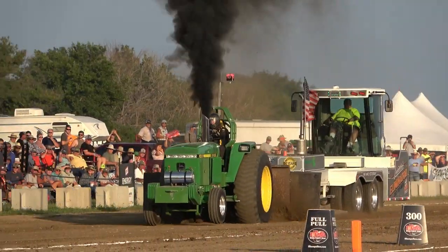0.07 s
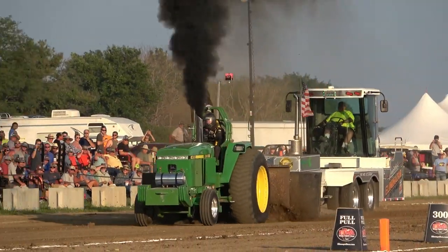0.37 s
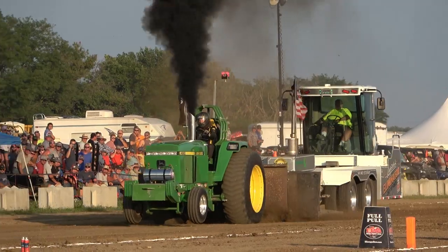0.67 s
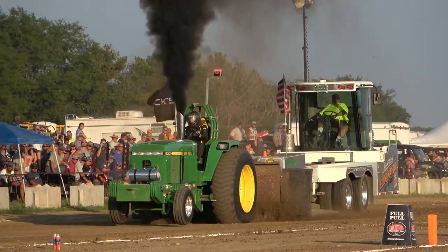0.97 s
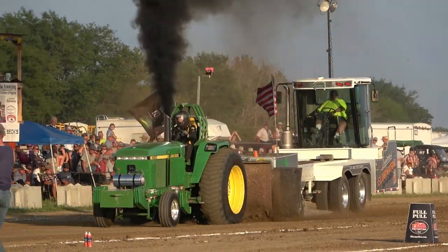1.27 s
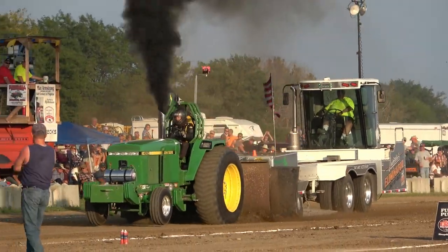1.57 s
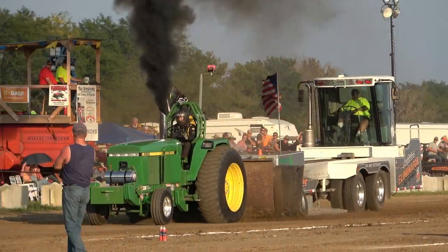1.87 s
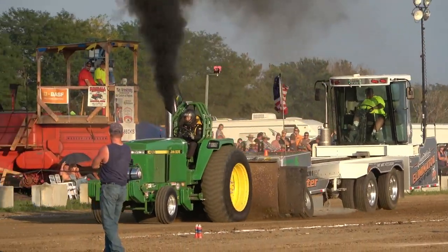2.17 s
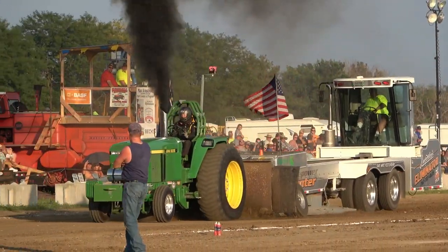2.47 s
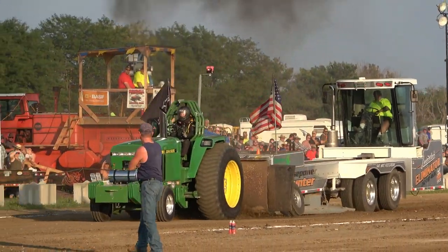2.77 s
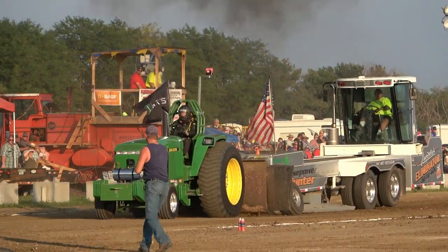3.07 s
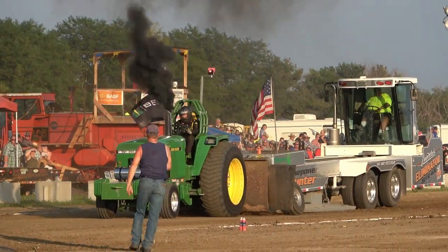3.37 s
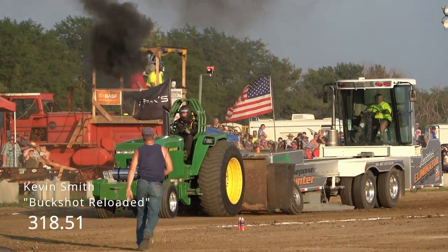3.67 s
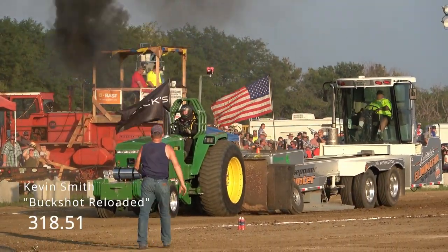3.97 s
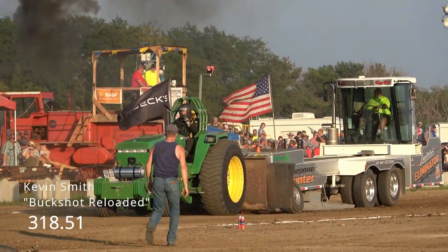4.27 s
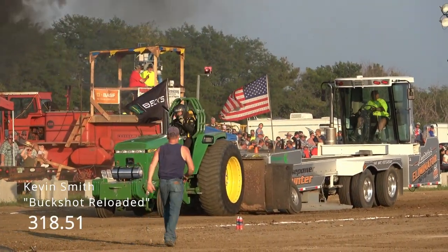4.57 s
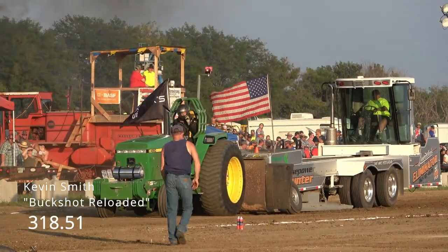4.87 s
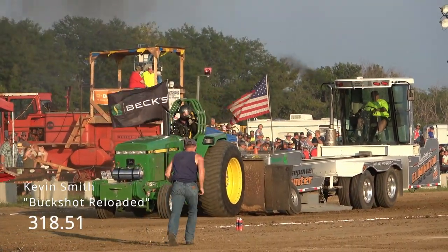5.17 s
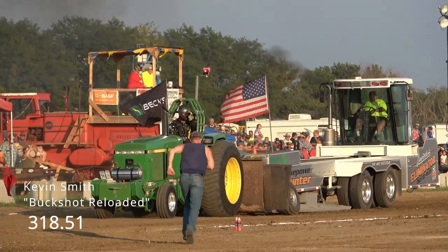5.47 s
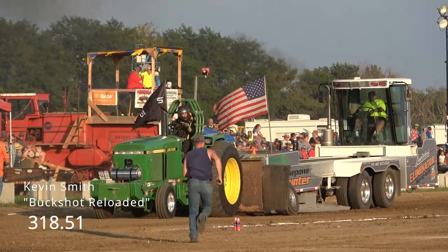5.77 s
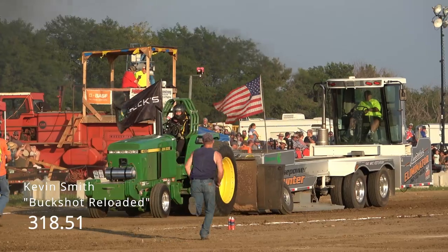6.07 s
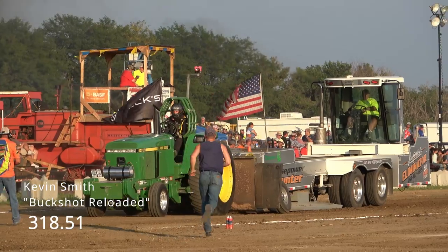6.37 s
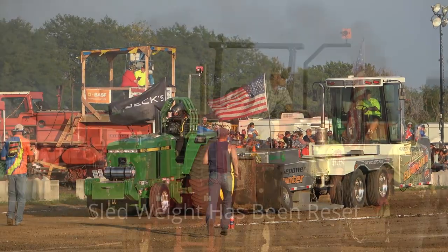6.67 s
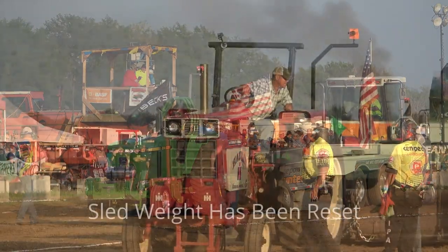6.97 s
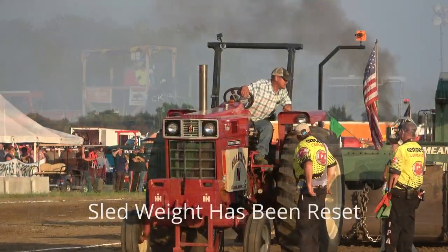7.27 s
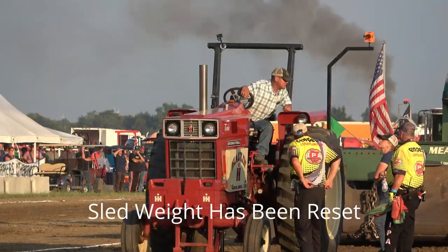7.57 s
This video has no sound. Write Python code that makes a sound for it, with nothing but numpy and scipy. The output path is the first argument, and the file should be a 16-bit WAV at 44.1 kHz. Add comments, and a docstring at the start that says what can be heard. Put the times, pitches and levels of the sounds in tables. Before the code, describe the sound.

A diesel tractor drags a sled at full throttle, its exhaust droning under a roaring hiss. The throttle shuts abruptly, and the turbo flutters and faintly whistles down as the engine gives a short, low blip. Engines tick over quietly with rumble and clatter. Near the end a second tractor fades in with a fast, loping chug over deep wind rumble, heard from beside an outdoor track.

```python
"""A six-cylinder diesel pulling tractor drags a sled at full throttle: firing pulses make its stack
drone while the gas jet roars and hisses. At 2.75 s the throttle shuts, trapped boost flutters back
through the turbo and its blades whistle down. After a short throttle blip, the engines of tractor and
sled tick over quietly, with a few faint whines. From about 6.4 s a second tractor fades in at the
start line over a deep wind rumble, loping ten times a second as its governor hunts."""
import sys
import numpy as np
from scipy.fft import rfft, irfft, next_fast_len
from scipy.io import wavfile
from scipy.ndimage import map_coordinates

SR = 44100
rng = np.random.default_rng(int(sys.argv[2]) if len(sys.argv) > 2 else 0)


def persist_wave(psi):
    """Save psi, clipped to +-1, as 16-bit WAV."""
    counts = np.round(np.clip(psi, -1, 1) * 32767).astype(np.int16)
    wavfile.write(sys.argv[1], SR, np.atleast_2d(counts).T)


N = 344401
TIME = np.arange(N) / SR

# Firing rate under load: t/s, f/Hz
PULL_FIRING = [(0, 222.4), (0.45, 210.9), (0.74, 188.1), (1.12, 188.1), (1.28, 183.2), (1.49, 192.6),
               (1.69, 176.9), (1.88, 199.5), (1.96, 198), (2.14, 184.5), (2.31, 197), (2.39, 194.1),
               (2.53, 180), (2.72, 191.9)]
# Exhaust overtones on thirds of the firing rate, mostly between its harmonics: multiple of a third of the
# firing rate, level/dB
STACK_OVERTONES = [(4, -7), (5, -0.5), (7, -0.5), (8, -2.5), (9, -11.5), (10, -14.5)]
# Spectrum of the exhaust's turbulent low end: f/Hz, level/dB
BLAST_SPECTRUM = [(12, -7), (30, -10), (62, 3.5), (105, -1), (220, 5), (380, -3), (600, -2.5), (800, -15.5),
                  (1300, -35)]
# The gas jet's four broad resonances, low to high: f/Hz, level/dB
JET_ROAR = [(600, -9), (830, -10), (1150, -2), (1480, 0), (1680, -2), (1950, 1.5), (2550, -0.5), (3050, -8),
            (3900, -14.5)]
JET_LOWER_HISS = [(2900, -18), (3450, -8), (4100, -1), (4600, 0), (5000, -2), (5450, -11), (6200, -17)]
JET_UPPER_HISS = [(5700, -24), (6250, -10.5), (6800, -1.5), (7250, -3), (7700, -2.5), (8500, -24)]
JET_SIZZLE = [(7700, -18), (8500, -4.5), (9300, -1.5), (9900, -6), (10800, -12), (12200, -13.5),
              (14000, -21.5), (16500, -20)]
# Envelope of the jet's treble: t/s, level/dB
JET_TREBLE_ENVELOPE = [(0.0, -32.5), (0.11, -33), (0.86, -31.5), (1.14, -35), (1.35, -31), (1.65, -37),
                       (1.82, -30.5), (2.33, -28.5), (2.72, -35)]
# Envelope of the firing tones at fast idle: t/s, level/dB
IDLE_ENVELOPE = [(2.9, -36), (4, -42), (5.2, -37.5), (6.1, -34), (7, -35)]
# Partials at fast idle: multiple of the engine cycle rate, level/dB
IDLE_PARTIALS = [(6, 6), (10, -4.5), (11, -8), (12, 1), (20, -12.5)]
# Partials of the sled's hum: multiple of its pitch, level/dB
HUM_PARTIALS = [(1, -0.5), (2, -17), (1.225, -19), (1.425, -17)]
# Spectra of the idling engines' rumble and of their valve and injector clatter: f/Hz, level/dB
RUMBLE_SPECTRUM = [(15, -25), (28, -5), (41, 7), (52, 0.5), (85, 4.5), (115, -5.5), (180, 1.5), (255, -10),
                   (330, -6), (420, -14.5), (700, -44)]
CLATTER_SPECTRUM = [(330, -11), (450, 0), (650, -0.5), (900, -3.5), (1150, -1), (1700, -6), (2300, -8),
                    (3200, -15), (5000, -19), (5600, -27.5), (7400, -26.5), (8300, -32), (9000, -30.5),
                    (11500, -42), (16000, -46)]
# Spectrum of the air through the coasting turbo: f/Hz, level/dB
TURBO_AIR_SPECTRUM = [(250, 0.5), (500, 5.5), (850, -7), (1500, -2), (2400, -5), (3300, -9), (4800, -11),
                      (5900, -20), (7200, -15.5), (9200, -21), (15500, -44)]
# Compressor surges, one chuff each: t/s, level/dB
SURGE_CHUFFS = [(2.928, -31), (3.03, -33.5), (3.127, -38), (3.215, -40), (3.325, -43), (3.655, -44),
                (3.73, -40.5), (3.8, -42), (3.868, -43), (3.94, -46.5), (4.02, -47)]
# Resonances that the turbo's two whistles fall through: f/Hz, width/Hz, level/dB
BLADE_RESONANCES = [(8600, 280, 3), (6830, 170, 5), (5900, 100, 0)]
TURBINE_RESONANCES = [(10800, 500, -4), (7500, 420, 4)]
# Spectrum of the blip's exhaust puffs: f/Hz, level/dB
BLIP_SPECTRUM = [(70, -14), (130, -4), (175, 3), (240, -5.5), (330, -9), (500, -25)]
# Faint passing whines: f/Hz, level/dB, peak t/s, half length/s
WHINE_SWELLS = [(852, -52, 5.22, .13), (1141, -54, 5.6, .4), (1766, -54, 5.35, .22)]
# Partials of the second tractor's drone: multiple of the firing rate, level/dB
LOPE_PARTIALS = [(0.461, -14), (.78, -10), (1, -0.5)]
# Exhaust bark, with a deep rumble of wind on the microphone beneath it (8-24 Hz): f/Hz, level/dB
BARK_AND_WIND_SPECTRUM = [(8, -3), (14, -7), (24, -3), (45, 4), (80, 1.5), (108, -4.5), (200, -1.5),
                          (320, 2), (390, -11), (470, -15), (560, -10), (800, -35)]
# Spectrum of the second tractor's mechanical rattle: f/Hz, level/dB
RATTLE_SPECTRUM = [(450, -15), (700, -7), (900, -5), (1300, -2), (1700, -8), (2400, -12), (3100, -15.5),
                   (3750, -16.5), (5000, -21), (6400, -27.5), (7500, -24.5), (9000, -32.5), (12000, -43),
                   (15500, -58)]

SHUT_S, CUT_S, CUT_DB = 2.75, 0.029, 6  # the throttle shuts: cue, length and depth of the first drop
LOW_IDLE_HZ = 70.1  # firing rate the pulling engine settles to
CROSSFADE_S = 6.55  # the idling engines start to give way to the second tractor


def amp(db):
    """Decibels to gain."""
    return 10 ** (np.asarray(db) / 20)


def unit(x):
    """Scale to rms 1."""
    return x / np.sqrt(np.mean(x ** 2) + 1e-20)


def curve(rows):
    """An envelope through (time, value) breakpoints."""
    return np.interp(TIME, *np.transpose(rows))


def fade(start, end):
    """A ramp from 0 to 1 between two times, at least 1 ms long."""
    return np.clip((TIME - start) / max(end - start, 1e-3), 0, 1)


def since(s):
    """Seconds gone by after a cue, 0 before it."""
    return np.maximum(TIME - s, 0)


def swell(s, width):
    """A bell-shaped swell around a time."""
    return np.exp(-.5 * ((TIME - s) / width) ** 2)


def wobble(rate):
    """A smooth random curve, rate knots a second."""
    return map_coordinates(rng.standard_normal(int(N * rate / SR) + 4), [TIME * rate], order=2)


def filtered(x, response):
    """Equalise x with a gain that is a function of frequency."""
    size = next_fast_len(N + 8192)
    return irfft(rfft(x, size) * response(np.fft.rfftfreq(size, 1 / SR)), size)[:N]


def noise(spectrum, gate=1):
    """Noise of rms 1, chopped by a gate and then coloured by (f/Hz, level/dB) points."""
    f, db = np.transpose(spectrum)
    colour = lambda hz: amp(np.interp(np.log(hz + 1e-3), np.log(f), db, left=-120, right=-120))
    return unit(filtered(gate * rng.standard_normal(N), colour))


def bend(x, ratio):
    """Pitch-bend a steady noise by a slowly changing ratio."""
    return unit(map_coordinates(x, [np.cumsum(ratio) % (N - 1)], order=3))


def turns(hz):
    """Running phase of a rate, in radians."""
    return 2 * np.pi * np.cumsum(hz) / SR


def tones(phase, partials, waver_db, rate):
    """Partials of one rotation, each wavering in level by itself."""
    return sum(amp(db + waver_db * wobble(rate)) * np.sin(k * phase + rng.uniform(0, 2 * np.pi))
               for k, db in partials)


def airy(hz, width):
    """A breathy whistle: a narrow band of noise around a moving pitch."""
    phase = turns(hz)
    return unit(wobble(width) * np.cos(phase) + wobble(width) * np.sin(phase))


def pulling_engine():
    """Six cylinders fire into the stack; every third blows harder, adding thirds of the firing rate."""
    run_down_s, run_down_db_per_s = .22, 82
    stack_hz, off_tune_db_per_hz = 189.8, 0.24
    firing_hz = LOW_IDLE_HZ + (curve(PULL_FIRING) - LOW_IDLE_HZ) * np.exp(-since(SHUT_S) / run_down_s)
    phase = turns(firing_hz * (1 + 0.0051 * wobble(44)))
    # the drone thins out above the stack's tuning, and the strokes grow more uneven with speed
    drone_db = -10.5 - off_tune_db_per_hz * np.maximum(firing_hz - stack_hz, 0)
    uneven_db = np.minimum(-15.5 + 0.4 * (firing_hz - 190), -3)
    strokes = 1 + amp(uneven_db) * np.cos(phase / 3)
    drone = amp(drone_db + 0.7 * wobble(20)) * unit(np.cos(phase)) * strokes
    # the overtones line up on the strong stroke, and no two strokes are alike
    overtone = lambda k: amp(1.6 * wobble(18)) * np.cos(k * phase / 3 + .28 * wobble(50))
    thirds = unit(sum(amp(db) * overtone(k) for k, db in STACK_OVERTONES))
    octave = unit(overtone(6))
    growl = amp(0.1 * np.minimum(uneven_db + 20, 0) - 7) * thirds + amp(-6.5) * octave
    blast = noise(BLAST_SPECTRUM, gate=1 + 0.037 * np.cos(phase / 3))
    exhaust = drone + amp(-21.5) * (growl + amp(-2) * blast)
    # starved of fuel, the firing stumbles; the level drops at once, then runs down
    stumble_hz, stumble_depth = 20.5, 0.68
    stumble = 1 - stumble_depth * np.sin(np.pi * stumble_hz * since(SHUT_S)) ** 2
    release_db = -CUT_DB * fade(SHUT_S, SHUT_S + CUT_S) - run_down_db_per_s * since(SHUT_S + CUT_S)
    return -exhaust * stumble * amp(release_db), phase


def stack_jet(phase):
    """The gas jet pulses with the firing, and each of its resonances flickers in the wind."""
    glide = curve([(0, 1.052), (1.5, 0.98)])  # the resonances sink as the tractor nears
    treble_db = curve(JET_TREBLE_ENVELOPE)
    treble_swing_db = treble_db - treble_db[TIME < SHUT_S].mean()
    bands = [(-26, JET_ROAR, glide ** 1.9),  # the roar sinks further than the hiss
             (-28.5 + 0.3 * treble_swing_db, JET_LOWER_HISS, glide),
             (treble_db - 1.5, JET_UPPER_HISS, glide),
             (treble_db - 4, JET_SIZZLE, glide)]
    # gusts bend each resonance a little up and down
    jet = sum(amp(db + 0.95 * wobble(16)) * bend(noise(spectrum), ratio * (1 + .014 * wobble(9)))
              for db, spectrum, ratio in bands)
    puffs = 1 - 0.2 * np.cos(phase) + 0.17 * np.cos(phase / 2)
    throttle = amp(-CUT_DB * fade(SHUT_S, SHUT_S + CUT_S))
    boost_left = 1 - fade(2.87, 3.03)
    return jet * puffs * throttle * boost_left


def idling_engines():
    """A bed of engines ticking over: firing tones, the sled's hum, rumble, clatter and a thin whistle."""
    firing_hz, hum_hz, hum_sag_hz_per_s = 94.7, 232.2, 1.196
    idle_time = since(4)
    grow_db = 2 * idle_time  # the bed creeps up in level
    cycle = turns(firing_hz * (1 + .008 * wobble(20))) / 6  # six firings to an engine cycle
    firing = amp(curve(IDLE_ENVELOPE)) * tones(cycle, IDLE_PARTIALS, waver_db=1.6, rate=12)
    hum_phase = turns(hum_hz - hum_sag_hz_per_s * idle_time)
    hum = amp(-31 + grow_db) * tones(hum_phase, HUM_PARTIALS, waver_db=1.5, rate=6)
    rumble = amp(-34 + grow_db) * noise(RUMBLE_SPECTRUM, gate=1 + 0.21 * np.cos(cycle))
    # valves and injectors tick in a loop one engine cycle long
    loop = noise(CLATTER_SPECTRUM)[SR:][:round(SR * 6 / firing_hz)]
    loop_position = cycle / (2 * np.pi) % 1 * len(loop)
    ticks = map_coordinates(loop, [loop_position], order=3, mode="wrap")
    knocks = noise(CLATTER_SPECTRUM, gate=1 + .15 * np.cos(4 * cycle) + .11 * np.cos(3 * cycle))
    clatter = amp(-41.5 + .75 * grow_db + .4 * wobble(16)) * (knocks + amp(-7.5) * ticks)
    whistle_hz = 6325 + 45 * idle_time ** 2 + 25 * wobble(5)  # climbs ever faster
    whistle = amp(-64.5 + grow_db + wobble(12)) * airy(whistle_hz, width=270) * fade(3.6, 4)
    fader = fade(2.62, 2.91) * (1 - fade(CROSSFADE_S, CROSSFADE_S + 0.76))
    return (firing + hum + rumble + clatter + whistle) * fader


def coasting_turbo():
    """Trapped boost blows off and coughs back through the compressor; air dies and blade tones fall."""
    coast_s, blade_start_hz, slowing_per_s = 2.95, 10130, .54
    chuff_s, chuff_shrink_per_s = .03, 0.78  # half length at coast_s; later chuffs get tighter
    vent = fade(2.78, 2.781) * (1 - fade(2.94, 2.98))
    blow_off = amp(-32.5) * vent * noise([(1700, -18), (2050, -7), (2350, -1), (2900, -9)])
    air_db = -33.5 - 9 * since(3.2)  # holds, then dies away
    air = amp(air_db + 0.91 * wobble(24.96)) * noise(TURBO_AIR_SPECTRUM) * fade(2.81, 2.84)
    chuffs = sum(amp(db) * swell(s, chuff_s * np.exp(-chuff_shrink_per_s * (s - coast_s)))
                 for s, db in SURGE_CHUFFS)
    flutter = chuffs * noise([(1500, 5), (4200, 3.5), (5800, -6), (7500, -2), (9500, -5),
                              (13000, -17), (15500, -21)])
    blade_hz = blade_start_hz * np.exp(-slowing_per_s * since(coast_s))
    blades = amp(-57) * flaring_whistle(blade_hz, BLADE_RESONANCES, width=550)
    turbine = amp(-62) * flaring_whistle(1.412 * blade_hz, TURBINE_RESONANCES, width=600)
    return blow_off + air + flutter + blades + turbine


def flaring_whistle(hz, resonances, width):
    """A breathy tone that flares wherever its pitch crosses a resonance."""
    flare = sum(amp(db) * np.exp(-.5 * ((hz - centre) / spread) ** 2) for centre, spread, db in resonances)
    return airy(hz, width) * flare


def throttle_blip():
    """A dab of fuel catches the slowing engine: low firing tones and throbbing puffs swell and settle."""
    start_s, full_s, decay_db_per_s, rev_hz = 3.09, 3.24, 12.5, 10
    firing_hz = LOW_IDLE_HZ + rev_hz * swell(3.9, width=.17)
    phase = turns(firing_hz * (1 + 0.031 * wobble(40)))
    firing = tones(phase, [(1, -1), (2, -1)], waver_db=1.5, rate=35)
    throb = 1 + 0.51 * np.cos(phase / 6)  # once an engine cycle
    puffs = amp(-1) * noise(BLIP_SPECTRUM, gate=throb)
    envelope = fade(start_s, full_s) * amp(-29.5 - decay_db_per_s * since(full_s))
    return envelope * (firing + puffs)


def faint_whines():
    """Brief thin tones peek out of the machine noise."""
    return sum(amp(db) * swell(s, half_length) * airy(np.full(N, hz), width=14)
               for hz, db, s, half_length in WHINE_SWELLS)


def second_tractor():
    """The governor hunts: each gulp of fuel makes the engine rev, bark and rattle; wind rumbles below."""
    gulps_per_s, gulp_peak_s = 10, 7.455
    base_hz, climb_hz_per_s, swing_hz = 153.6, 10, 7.6
    full_s, rise_db_per_s = 7.39, 13.5
    fuel = np.cos(2 * np.pi * gulps_per_s * (TIME - gulp_peak_s)) * (1 + 0.29 * wobble(12))
    firing_hz = base_hz + climb_hz_per_s * since(CROSSFADE_S) + swing_hz * fuel
    phase = turns(firing_hz * (1 + 0.01203 * wobble(40)))
    drone = amp(-10 + fuel) * tones(phase, LOPE_PARTIALS, waver_db=2.05, rate=41)
    puffs = 1 + 0.16 * np.cos(phase)
    chug = amp(3 * fuel)
    octave = amp(-3) * np.sin(2 * phase)
    bark_and_wind = amp(-23.5) * chug * (noise(BARK_AND_WIND_SPECTRUM, gate=puffs) + octave)
    rattle = amp(1.5 * fuel) * noise(RATTLE_SPECTRUM, gate=puffs)
    # the intake hiss and a breathy whine climb as its turbo spools up
    spool = .93 + .09 * fade(6.8, 7.6)
    hiss = noise([(7500, -22), (9000, -18), (9750, -8), (10900, -23)])
    intake = amp(-22.5) * fade(6.7, 7.1) * chug * bend(hiss, spool)
    whine = amp(-16) * chug * airy(3700 * spool, width=700) * swell(7.75, width=0.31)
    fader = fade(6.43, 6.84) * amp(-rise_db_per_s * np.maximum(full_s - TIME, 0))
    return fader * (drone + bark_and_wind + amp(-34) * (rattle + intake + whine))


def scene():
    """All machines in mono, heard from the side of the open track."""
    exhaust, phase = pulling_engine()
    pull = exhaust + stack_jet(phase)
    wind_down = idling_engines() + coasting_turbo() + throttle_blip() + faint_whines()
    return (pull + wind_down + second_tractor())[None]


def record(dry):
    """A soft clip rounds off the highest peaks, and a brick-wall low-pass trims the very top."""
    ceiling, top_hz = .72, 15720
    rounded = dry[0] / (1 + np.abs(dry[0] / ceiling) ** 6) ** (1 / 6)
    return filtered(rounded, lambda hz: hz < top_hz)[None]


dry = scene()
out = record(dry)
persist_wave(out)
```